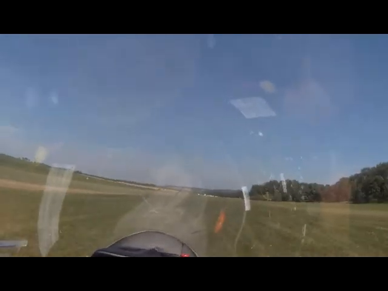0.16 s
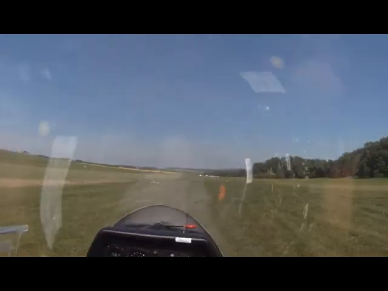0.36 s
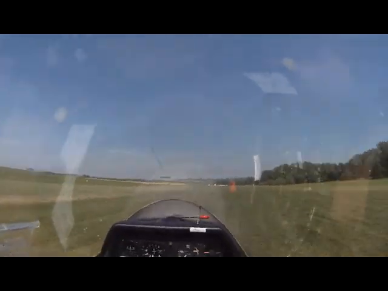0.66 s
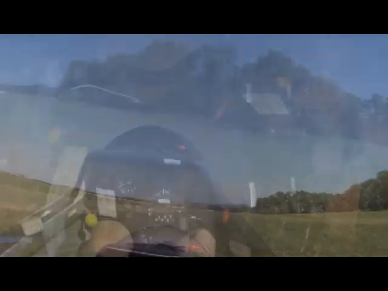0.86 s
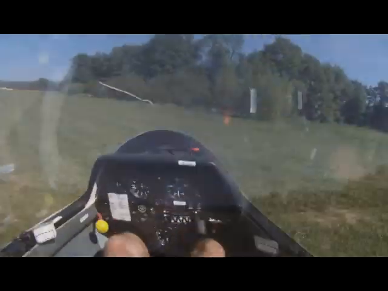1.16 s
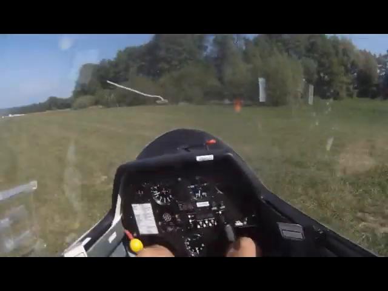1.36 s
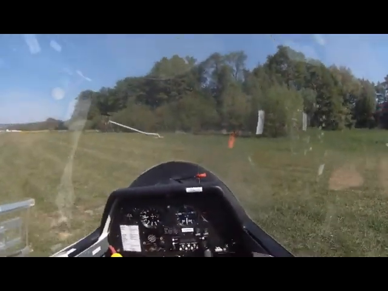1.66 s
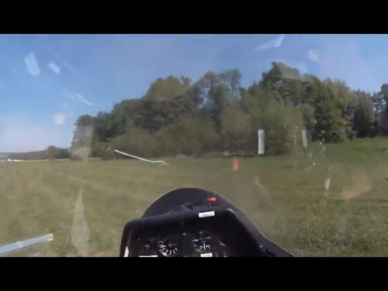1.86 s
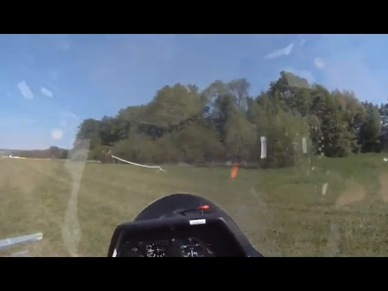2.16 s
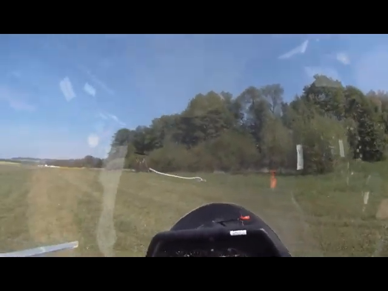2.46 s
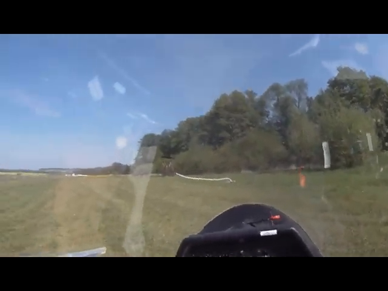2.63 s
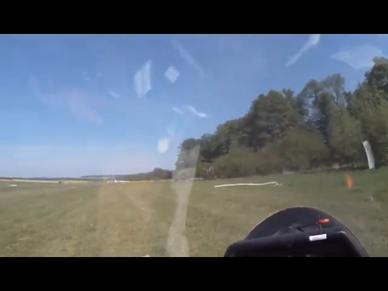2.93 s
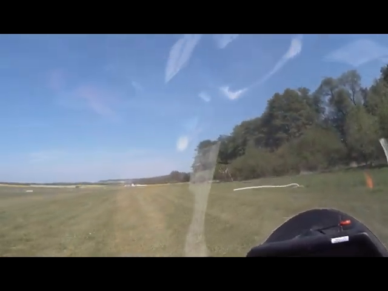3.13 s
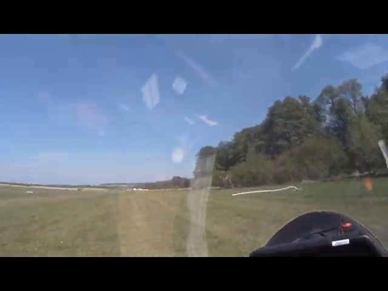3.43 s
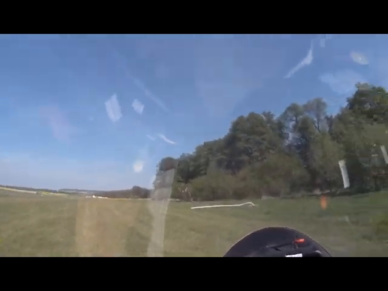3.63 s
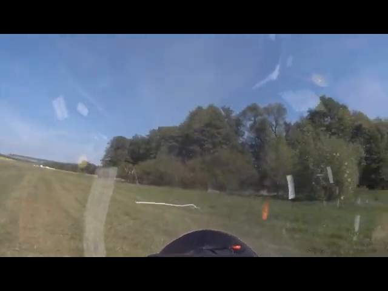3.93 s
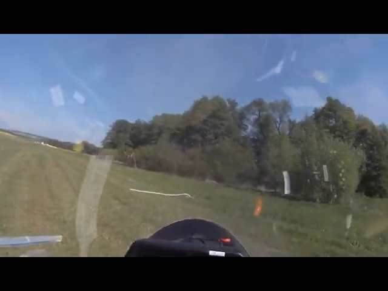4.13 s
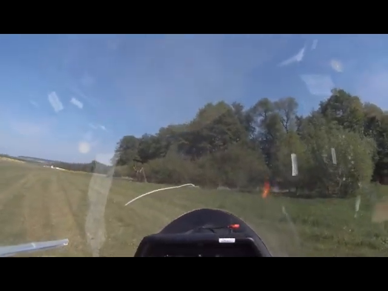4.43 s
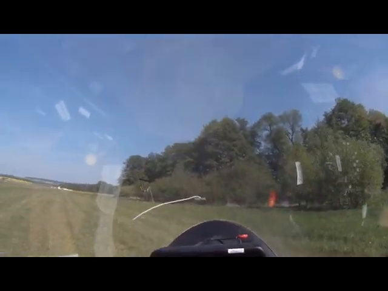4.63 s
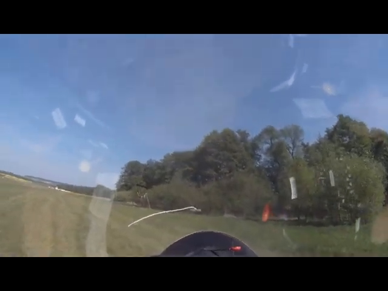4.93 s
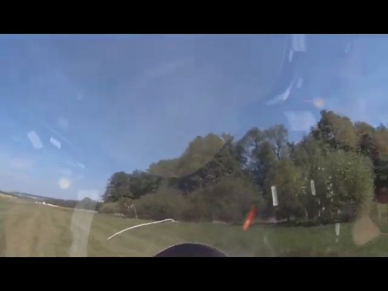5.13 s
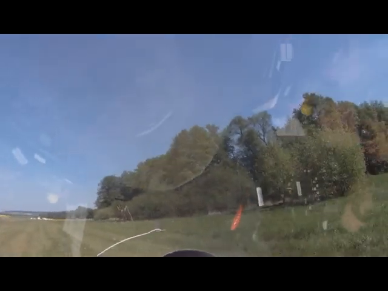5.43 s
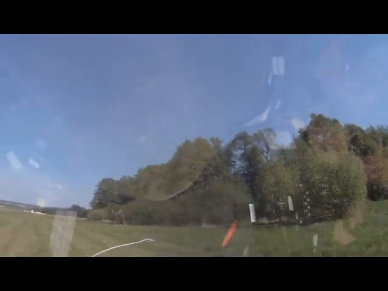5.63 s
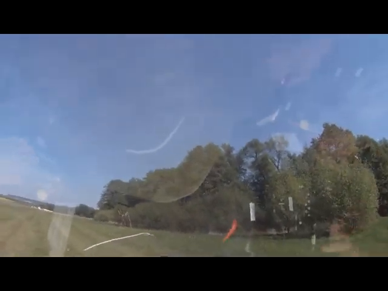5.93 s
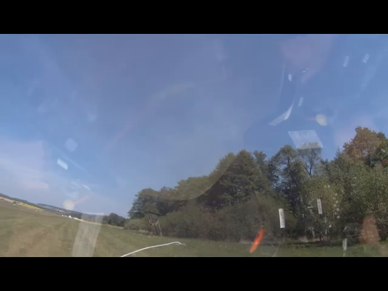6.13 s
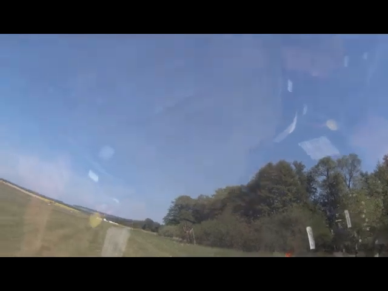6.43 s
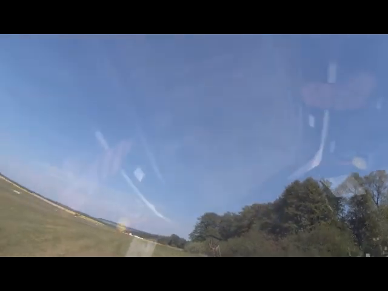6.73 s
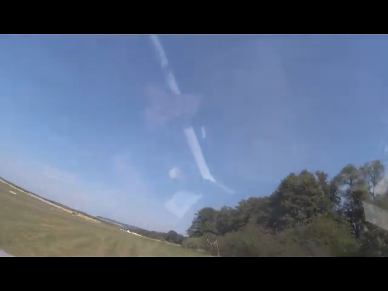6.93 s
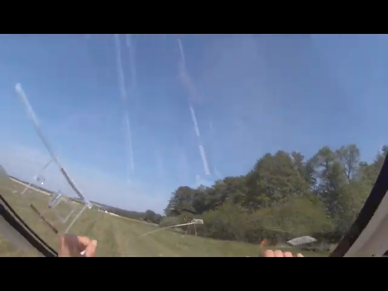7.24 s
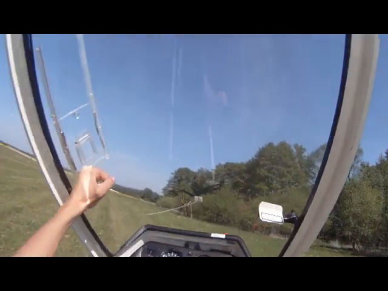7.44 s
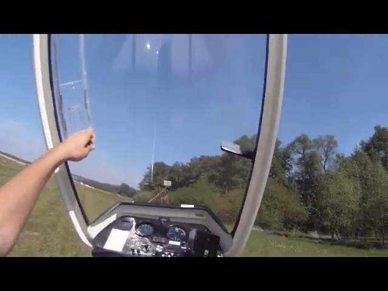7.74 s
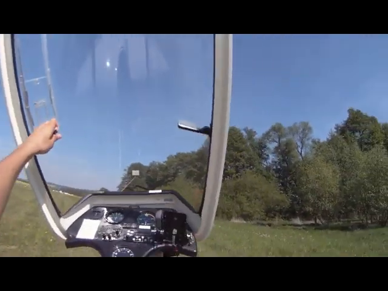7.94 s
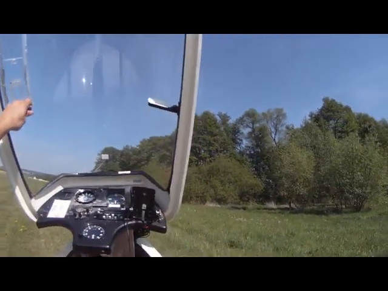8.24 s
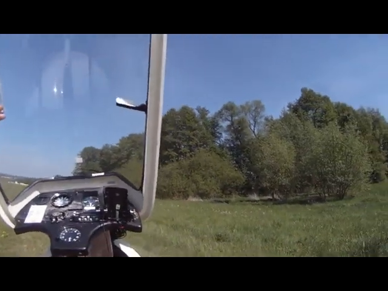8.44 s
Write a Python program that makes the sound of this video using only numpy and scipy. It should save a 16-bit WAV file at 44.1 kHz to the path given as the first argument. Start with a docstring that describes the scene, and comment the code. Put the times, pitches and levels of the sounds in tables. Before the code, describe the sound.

Inside a glider rolling over rough grass, a microphone shut in a plastic case catches violent clattering, low wheel rumble, distorted cracks and tiny metallic jingles. A last heavy lurch comes just after two seconds, then the noise falls away. Sparse muffled knocks and scuffs follow as the pilot stirs, then a brief latch creak, thin squeaks and faint hiss as the canopy opens.

```python
"""A glider rolls out over bumpy grass, stops, and the pilot stirs and opens the canopy.
Place: aboard the glider. Microphone: shut inside a camera case, so distance is nil for whatever touches it.
Lurches, knocks and scuffs are noisy impacts ringing four vibrating zones of the case; dry ticks ring their own.
Wheel rumble and fuselage heave are coloured noise, a fitting jingles in decaying modes, and the canopy
creaks in stick-slip harmonics and squeaks in wavering sines. The hardest knocks overload the microphone."""
import sys
import numpy as np
from scipy import signal
from scipy.fft import rfft, irfft
from scipy.io import wavfile
from scipy.ndimage import uniform_filter1d

SR = 44100
rng = np.random.default_rng(int(sys.argv[2]) if len(sys.argv) > 2 else 0)


def unload_audio(sound):
    """Save the sound as a 16-bit wav file, at the path given as the first command line argument."""
    columns = np.transpose(np.atleast_2d(sound))
    # keep every value between -1 and 1, then stretch to whole-number steps
    steps = np.round(np.clip(columns, -1, 1) * 32767)
    wavfile.write(sys.argv[1], SR, steps.astype(np.int16))


N = 378819


def gain_of(db):
    """Decibels to amplitude gain."""
    return 10 ** (np.asarray(db) / 20)


def evened(x):
    """Scales a signal to rms 1."""
    return x / np.sqrt(np.mean(x ** 2) + 1e-20)


def curve(rows):
    """Joins a table's timed points by straight lines: each column as one value a sample."""
    s, *columns = np.transpose(rows)
    return np.array([np.interp(np.arange(N) / SR, s, column) for column in columns])


def add(mix, s, sound):
    """Adds a sound to the mix from s seconds on, along the last axis."""
    part = mix[..., max(0, round(s * SR)):][..., :sound.shape[-1]]
    part += sound[..., :part.shape[-1]]


def coloured(points):
    """Steady noise of rms 1 with a given spectrum, joined along log frequency."""
    hz = np.fft.rfftfreq(N, 1 / SR)
    f, db = np.transpose(points)
    colour_db = np.interp(np.log(hz + 1), np.log(f + 1), db)
    return evened(irfft(rfft(rng.standard_normal(N)) * gain_of(colour_db), N))


def flicker(seconds, spread_db):
    """Random gain of rms 1, from noise averaged over the given time."""
    wander = uniform_filter1d(rng.standard_normal(N), max(2, int(seconds * SR)))
    return evened(gain_of(spread_db * evened(wander)))


def ringing(modes):
    """Response of a zone to a tick, energy 1; each mode swells and dies, so its skirts are steep."""
    t = np.arange(4096) / SR
    tick = np.zeros(len(t))
    for k, (hz, width_hz, db) in enumerate(modes):
        swell_and_die = width_hz ** 2 * t * np.exp(-1.5 * np.pi * width_hz * t)
        tick += (-1) ** k * gain_of(db) * swell_and_die * np.sin(2 * np.pi * hz * t)
    return tick / np.linalg.norm(tick)


# steady shaking of the case over the grass: t/s, shake level/dB,
# weight/dB (how much of it comes up from the wheel and fuselage)
ROLL = [(0.0, -23.5, 1.5), (0.15, -34, -1), (0.22, -25, 4), (0.44, -27, 1), (0.58, -33.5, 4),
        (0.88, -28, 0.5), (1.1, -21, -5.5), (1.3, -24, -5.5), (1.38, -28.5, -1), (1.43, -30.5, -23),
        (1.55, -38, -4), (1.66, -35, -6.5), (1.8, -44.5, -6), (2.0, -47, 5), (2.2, -41, -4),
        (2.53, -38.5, -2), (2.66, -47, 0), (3.05, -55.5, -3.5), (3.45, -55.5, -0.5), (3.9, -49, 0),
        (4.08, -49.5, -4.5), (4.2, -58, -1.5), (4.7, -51, -1.5), (5.2, -55.5, 2.5), (5.6, -48, -4),
        (5.8, -55, 2), (6.45, -55.5, 1), (6.78, -55, -3.5), (6.9, -53.5, -2), (7.04, -49.5, -2),
        (7.12, -55, -4), (7.3, -53.5, -1.5), (7.5, -58.5, -13), (8.2, -60.5, -9), (8.4, -59, -9.5),
        (8.59, -60, -6.5)]
# share of the shaking, rows shell, wall, port, rattle, rumble: level/dB, dB per dB of weight,
# dB per dB of shake (above -40 dB for the zones, above -34.5 dB for the rumble)
SHARES = [(-3.5, 0.5, 0.07), (-1.5, 0.08, 0.0578), (-3, -0.23, 0.1964), (-20.5, -0.52, 0.0639),
          (-12.5, 1.04, -0.05)]
# lurches of the whole fuselage: t/s of the top, shake level/dB, rumble level/dB, t60/s, heave level/dB
LURCHES = [(.02, -38, -29, 0.44, -49), (0.333, -20.5, -32.5, 0.44, -50), (.99, -15, -29, 0.16, -57),
           (1.881, -34, -42.5, 1.6, -51.5), (2.249, -17, -27.5, 0.68, -39.5), (3.507, -43, -56, 2.4, -56),
           (4.74, -46.5, -57, 1.4, -58), (4.87, -37.5, -41, 0.7, -72), (5.841, -42.5, -48, 2.45, -54),
           (6.79, -68, -49.5, 0.55, -64), (7.06, -47.5, -45, 0.32, -64)]
LURCH_RISE_S = 0.027
HEAVE_DB, HEAVE_PER_SHAKE = -61.5, 0.75  # rolling heave at -40.5 dB of shake, before rumble() trims it; dB per dB


def motion():
    """Drive of the four zones, the wheel rumble and the heave: the roll plus dying lurches, added as power."""
    roll_db, weight_db = curve(ROLL)
    t = np.arange(2 * SR) / SR
    lurch_power = np.zeros((3, N))
    for s, shake_db, rumble_db, t60, heave_db in LURCHES:
        shape = gain_of(-60 * t / t60) * np.minimum(t / LURCH_RISE_S, 1)
        levels = gain_of([[shake_db], [rumble_db], [heave_db]])
        add(lurch_power, s - LURCH_RISE_S, (levels * shape) ** 2)
    share_db, per_weight, per_shake = np.transpose(SHARES)[:, :, None]
    total_db = 10 * np.log10(gain_of(roll_db) ** 2 + lurch_power[0])
    zones = gain_of(total_db + share_db + per_weight * weight_db + per_shake * (total_db + 40.0))
    wheel_db = roll_db + share_db[-1] + per_weight[-1] * weight_db + per_shake[-1] * (roll_db + 34.5)
    heave = gain_of(HEAVE_DB + HEAVE_PER_SHAKE * (roll_db + 40.5))
    wheel_level = np.sqrt(gain_of(wheel_db) ** 2 + lurch_power[1])
    heave_level = np.sqrt(heave ** 2 + lurch_power[2])
    return zones[:-1], wheel_level, heave_level


# spectrum of the wheel rumble: f/Hz, density level/dB
RUMBLE_COLOUR = [(12, -49), (40, -32), (70, -10.5), (107, 3.5), (146, -1), (200, -2.5), (260, -32),
                 (440, -120)]
# spectrum of the fuselage heave: f/Hz, density level/dB
HEAVE_COLOUR = [(12, -20), (26, -7), (40, -4), (62, -4.5), (90, -25), (200, -100)]
# trim on the heave as the airframe comes to rest: t/s, level/dB
OPEN_HEAVE = [(6.6, -3), (7.3, -8.5), (7.45, -25.5), (8.59, -27)]


def rumble(level, heave):
    """Lumpy low noise from the wheel, over the slow heave of the fuselage."""
    settling = gain_of(curve(OPEN_HEAVE)[0])
    heaving = heave * settling * coloured(HEAVE_COLOUR) * flicker(0.073, 2.8)
    return level * coloured(RUMBLE_COLOUR) * flicker(0.0078, 0.75) + heaving


BUMP_CAP = 1.6  # limit on the random bump size, which is then scaled to dB


def shaking(zones):
    """Force envelope of the jolting: a steady part plus small random bumps that strike fast and die away."""
    sizes = gain_of(7.8 * np.minimum(rng.exponential(1, N), BUMP_CAP))
    strikes = sizes * (rng.random(N) < 90 / SR)  # about 90 a second
    dying = gain_of(-60 * np.arange(4000) / SR / 0.13)
    bumps = evened(4.0 + signal.oaconvolve(strikes, dying)[:N])
    own = np.array([flicker(0.014, 2.5) for zone in zones])
    return zones * bumps * own


# knocks against the case: t/s, level/dB, thud rel. level/dB, chatter rel. level/dB,
# brightness/dB over the chatter, t60/s, ring f/Hz
KNOCKS = [(0.017, 5.5, -46, -13.5, 4, 0.006, 1384), (0.321, -7.5, -8.5, 1, 4, 0.028, 1213),
          (0.346, -13, -17, -22, 9.5, 0.059, 1120), (0.459, -17, -30, -5.5, -5, 0.25, 2820),
          (.678, -2, -35, -9.5, 3, 0.024, 1225), (0.76, -11, -21, -6, -1, 0.032, 1200),
          (.852, -14, -19, -8, 4, 0.12, 2560), (0.881, -5, -31, -24.5, 11, 0.2, 2607),
          (1.037, -16, -4.5, -24, 7, 0.14, 1140), (1.064, -14.5, -6, -2.5, -5, 0.13, 2760),
          (1.114, -13, -24, 6, 4, 0.022, 2680), (1.204, -8, -19, -7.5, 4, 0.12, 1360),
          (1.39, 5, -48, -10, -7, 0.022, 1934), (1.399, -17, -30, -14, 13, 0.044, 2720),
          (1.424, -10, -23, -32, 14, 0.053, 2710), (1.446, -19, -24, -4, 1, 0.07, 1290),
          (1.478, -20.5, -20, -12.5, 3, 0.033, 3420), (1.501, -12.5, -44, -30.5, 15.5, 0.12, 2630),
          (1.606, -13, -17, -2.5, 4.5, 0.075, 2730), (1.704, -24, -29, -10, 3, 0.044, 1260),
          (1.736, -20, -27, -10, 0, 0.027, 1230), (1.815, -20, -14, -1, 1.5, 0.093, 2830),
          (1.858, -27, -30, -16.5, 13, 0.018, 3430), (1.921, -7, -33, -10.5, -5.5, 0.026, 1176),
          (2.102, -13, -21.5, -5, -0.5, 0.11, 2580), (2.172, -7.5, -44, -10, -4, 0.019, 2020),
          (2.229, -20, -16, 0.5, 1.5, 0.04, 1405), (2.253, -14, -3.5, -1.5, 1.5, 0.05, 2800),
          (2.278, -14.5, -4.5, 0.5, -0.5, 0.084, 1260), (2.389, -7.5, -40, -12, 1.5, 0.019, 2010),
          (2.444, -22, -22, -5.5, 1, 0.15, 2770), (2.468, -21, -8.5, -4.5, 2.5, 0.15, 1100),
          (2.497, -20, -10.5, -7, 7.5, 0.095, 1150), (2.501, -25, -30, -6, 1, 0.046, 5250),
          (2.508, -26, -30, -8, 0, .05, 4750), (2.552, -21, -17.5, -1.5, 2, 0.12, 2860),
          (2.594, -24.5, -29, -6.5, 2, 0.17, 1077), (2.867, -27, -21, -1.5, 0.5, 0.082, 1230),
          (3.1, -36, -14, -1.5, -4, 0.1, 1235), (3.374, -38, -9, -3.5, 1.5, 0.15, 1197),
          (3.523, -39, -1, 1, -3.5, 0.18, 1280), (3.549, -43.5, -3, 7, -2, 0.065, 1250),
          (3.635, -45.5, 0, -11.5, 11.5, 0.053, 3070), (3.87, -50, -18, 7.5, 3, 0.033, 1370),
          (3.973, -34, -9, 1.5, -1, 0.18, 1060), (4.055, -31, -27, -0.5, -2, 0.098, 2680),
          (4.188, -45.5, -10.5, 7.5, -10.5, 0.077, 1260), (4.251, -43, -4, 1, 0.5, 0.12, 1144),
          (4.315, -51.5, -14, 0, 7, 0.051, 2600), (4.375, -36.5, -14, -12.5, 3.5, 0.24, 1294),
          (4.492, -41.5, -9.5, -7, 2, 0.18, 2510), (4.562, -44, -13, -3, -1, 0.044, 2700),
          (4.618, -29, -17.5, -1.5, 0, 0.098, 2670), (4.667, -42, -6, 0, -7.5, 0.037, 1220),
          (4.702, -46.5, -25, -14, 15, 0.022, 3130), (4.728, -41.5, -4, -0.5, 0, 0.15, 1340),
          (4.83, -24.5, 0, -2.5, 1.5, 0.12, 2690), (4.966, -33, -14, -14, 7, 0.14, 1460),
          (5.032, -54, -20, -3.5, 11, 0.18, 2780), (5.077, -38.5, -9.5, -5.5, 2.5, 0.11, 1370),
          (5.11, -42.5, -3, 1.5, -7, 0.094, 1246), (5.15, -39, -5, -21, -3.5, 0.035, 577),
          (5.189, -49.5, -9.5, -7.5, 7, 0.38, 2700), (5.263, -42, -7.5, -5, 1.5, 0.2, 1320),
          (5.438, -29.5, -12, -7.5, -9.5, 0.16, 1266), (5.496, -23.5, -20, -16, 4.5, 0.14, 1267),
          (5.573, -47.5, -9, -8, 9, 0.089, 2680), (5.924, -44, -13, -4, 9.5, 0.046, 2700),
          (6.007, -31, -10.5, -14.5, 6, 0.18, 1210), (6.116, -32.5, -13.5, -6, 6.5, 0.096, 2570),
          (6.145, -40.5, -4.5, -3, 3, 0.16, 2640), (6.254, -27.5, -41.5, -2, 0.5, 0.11, 1375),
          (6.566, -30, -3.5, 2.5, -5.5, 0.091, 1230), (6.696, -39.5, -1.5, -5.5, 0, 0.086, 1280),
          (6.911, -39.5, -27, -8, 1, 0.066, 2480), (7.062, -35.5, -8, -24, 13, 0.026, 253),
          (7.23, -37.5, -21, -4.5, -9, 0.045, 648), (7.269, -40, -25, -1.5, -9, 0.11, 1380),
          (7.318, -45, -3.5, -4, -7, 0.053, 750), (7.376, -32.5, -17, -7.5, 0.5, 0.048, 2590),
          (7.418, -32.5, -8.5, -5.5, -15, 0.047, 1097), (7.541, -47.5, -3.5, -0.5, -2, 0.18, 760),
          (7.579, -28, -33.5, -21, 8, 0.047, 1050), (7.606, -45, -39, -12, 10.5, 0.081, 1330),
          (7.762, -52, -5, -2.5, -5, 0.06, 1240), (7.86, -53, -24, -10.5, 12.5, 0.098, 2730),
          (7.97, -58, -2, 2.5, -1.5, 0.12, 1220), (8.032, -58.5, -2.5, -7, 5, 0.28, 556),
          (8.296, -55.5, -21, -0.5, 1.5, 0.66, 1830), (8.35, -49.5, -9, -7.5, 0, 0.075, 1214),
          (8.437, -55, -18.5, -10.5, 1.5, 0.13, 1310)]
# scuffs, which swell in where a knock strikes: same columns as the knocks
SCUFFS = [(0.265, -15.5, -8, -2.5, 0.5, 0.23, 1423), (0.324, -14.5, -1.5, -11, -6, 0.1, 308),
          (0.392, -21, -15, 2, -9, 0.11, 2670), (0.624, -14.5, -8.5, -2, 4.5, 0.14, 1428),
          (1.081, -20, -14, 4.5, 0, 0.18, 2610), (1.125, -18.5, -31, 4, 3.5, 0.041, 2680),
          (1.349, -10.5, -16.5, -0.5, 4, 0.11, 2557), (1.439, -19.5, -12, -10, -2, 0.069, 2750),
          (1.546, -26, -11, -9.5, 6, 0.059, 2710), (1.667, -32, -3, -1, -2, 0.16, 1270),
          (1.714, -28.5, -21, -5.5, 5.5, 0.21, 2950), (1.888, -29.5, -32, -1.5, -2, 0.19, 2670),
          (1.959, -40.5, -14, -7.5, 8.5, 0.21, 1266), (2.025, -33.5, -25, -1.5, -2, 0.078, 2580),
          (2.234, -11.5, -11, -4.5, 0.5, 0.41, 1246), (2.285, -14, -5, -1.5, -2, 0.086, 1277),
          (2.319, -20, 0, 2, -3, 0.13, 1264), (2.335, -13, -17, 0.5, 0.5, 0.098, 1285),
          (2.986, -36.5, -17, -5.5, 2.5, 0.12, 2570), (3.499, -35, -13, -5, -6, .088, 1308),
          (3.769, -37, -8.5, -5, 0, 0.51, 334), (3.931, -38.5, -3, -5, -3, 0.085, 2513),
          (4.765, -37, -4, -4.5, -3, 0.02, 2590), (4.841, -15.5, -10.5, -7.5, -1.5, 0.21, 304),
          (5.795, -51, -15, -7.5, 6.5, 0.08, 2710), (5.838, -36.5, -12.5, -7.5, 2.5, 0.3, 225),
          (5.867, -37.5, -3, 1, -3.5, 0.31, 2640), (6.063, -41, -3, 0, 3.5, 0.091, 968),
          (6.325, -36.5, -2.5, 0.5, 2.5, 0.15, 2970), (6.343, -21, -8.5, -1, 6, 0.087, 1234),
          (7.82, -36, -27, -7.5, 3.5, 0.07, 1243), (8.052, -50.5, -3.5, -12.5, -1, 0.12, 557),
          (8.078, -41, -8.5, -6.5, 3, 0.064, 1060)]
RISE_S, RISE_PER_T60, SCUFF_RISE_S = 0.0018, 0.0071, 0.012  # a longer knock also rises slower
RING_RISE = 1.2  # the struck spot swells this many times slower than the chatter
BLOW_DB, SCUFF_BLOW_DB = 13.5, 12  # the single hard contact, over each zone's level
RATTLE_DB, RATTLE_PER_BRIGHT = -22, 2.09  # rattle over the chatter: dB, and dB per dB of brightness


def knocks():
    """Zone forces (quick rise, fall soonest in the treble), a hard blow at their top, the struck spot's ring."""
    force_power, blows, ring = np.zeros((4, N)), np.zeros((4, N)), np.zeros(N)
    t = np.arange(SR // 4) / SR
    lasting = np.array([[1.3], [1.], [.9], [.7]])  # t60 factor of shell, wall, port, rattle
    contacts = [(RISE_S + RISE_PER_T60 * row[5], BLOW_DB, row) for row in KNOCKS]
    contacts += [(SCUFF_RISE_S, SCUFF_BLOW_DB, row) for row in SCUFFS]
    for rise, blow_db, (s, db, thud_db, chatter_db, bright_db, t60, hz) in contacts:
        rattle_db = chatter_db + RATTLE_DB + RATTLE_PER_BRIGHT * bright_db
        zones_db = db + np.array([[thud_db], [chatter_db], [chatter_db + bright_db], [rattle_db]])
        rising = np.clip(t / rise, 0, 1) ** 0.8
        fall_db = -60 * np.maximum(t - rise, 0) / max(t60, .008)
        add(force_power, s, (gain_of(zones_db + fall_db / lasting) * rising) ** 2)
        add(blows, s + rise, gain_of(zones_db + blow_db))
        ring_rise = RING_RISE * rise
        ring_fall_db = -60 * np.maximum(t - ring_rise, 0) / np.clip(t60, .008, 0.06)
        ring_level = gain_of(db - 3 + ring_fall_db) * np.clip(t / ring_rise, 0, 1)
        add(ring, s, ring_level * np.sin(2 * np.pi * hz * t))
    return np.sqrt(force_power), blows, ring


# four zones of the case, each a list of resonances: f/Hz, width/Hz, rel. level/dB
SHELL = [(243.4, 48, 2.5), (337, 50, -3.5), (427, 77.5, 1), (690, 376, -3.5)]
WALL = [(936, 380, -4.5), (1303, 274, 2), (1536, 130, -0.5), (1746, 460, -8)]
PORT = [(1894, 633, 0), (2650, 408, 7.5), (3022, 377, 2), (3445, 465, -7.5)]
RATTLE = [(5135, 850, 8.5), (6030, 1370, 0), (8000, 1100, -9)]


def case(shake):
    """Many tiny impacts, sized by the force, ring each zone of the case."""
    force, blows, ring = knocks()
    impacts = rng.standard_normal((4, N)) * flicker(0.0012, 2.3)
    zones = [ringing(modes) for modes in (SHELL, WALL, PORT, RATTLE)]
    hits = np.hypot(force, shaking(shake)) * impacts + blows
    return ring * flicker(0.0044, 2.3) + signal.oaconvolve(hits, zones, axes=1)[:, :N].sum(0)


PINGS_PER_S, PING_DB, PING_T60_S = 80, 2.5, 0.011  # level over the shaking, before the random size
PING_SPREAD = 0.052  # scatter of the pitches, in natural log of frequency


def pings(shake):
    """Loose parts tap the case at random: short rings near wall and port resonances, sized by the shaking."""
    struck = gain_of(1.3 * np.minimum(rng.exponential(1, N), 3)) * (rng.random(N) < PINGS_PER_S / SR)
    size = struck * shake
    spots = [WALL[1][0], PORT[1][0]] * 8
    spot = rng.integers(0, len(spots), N)
    t = np.arange(2048) / SR
    level = gain_of(PING_DB - 60 * t / PING_T60_S) * np.minimum(t / 0.0011, 1)
    out = np.zeros(N)
    for k, hz in enumerate(spots * np.exp(PING_SPREAD * rng.standard_normal(len(spots)))):
        ring = level * np.sin(2 * np.pi * hz * t)
        out += signal.oaconvolve(size * (spot == k), ring)[:N]
    return out


# dry bright ticks of plastic on plastic: t/s, level/dB of the force
TICKS = [(0.018, -15), (0.058, -40), (0.2095, -35), (.2655, -45), (0.311, -35.5), (0.322, -15), (.338, -41),
         (.35, -38.5), (0.6785, -17.5), (0.7, -39.5), (0.7614, -34), (0.7986, -39), (0.8565, -36),
         (0.8844, -24.5), (0.964, -37), (1.038, -37.5), (1.067, -35), (1.085, -31.5), (1.1163, -12.5),
         (1.1363, -37), (1.208, -26), (1.23, -24), (1.361, -26), (1.3901, -7.5), (1.6077, -40),
         (2.24, -38.5), (2.2475, -31), (2.254, -28), (2.26, -32), (2.271, -35), (2.279, -37.5),
         (2.2996, -31), (2.3441, -31), (2.348, -43), (6.2565, -56)]
# bursts of ticks too dense to tell apart: t/s, level/dB of the force, t60/s
FIZZES = [(.268, -68, 0.09), (.626, -59, 0.07), (6.339, -46, 0.12)]
# resonances of a tick: f/Hz, width/Hz, rel. level/dB
TICK = [(6300, 2500, -1.5), (9750, 1800, -5.5), (13300, 3600, -10)]
FIZZ_RISE_S = 0.0051


def ticks(shake):
    """Noise bursts ring the tick resonances: loud ones listed, small ones at random, sized by the shaking."""
    t, slow = np.arange(600) / SR, np.arange(SR // 8) / SR
    force = shake * gain_of(-36.5) * flicker(0.013, 3.)  # the faintest ticks merge into a fizz
    for s, db in TICKS:
        add(force, s, gain_of(db - 60 * t / 0.0073) * np.minimum(t / 0.00046, 1))
    for s, db, t60 in FIZZES:
        fall_db = -60 * np.maximum(slow - FIZZ_RISE_S, 0) / t60
        add(force, s, gain_of(db + fall_db) * np.minimum(slow / FIZZ_RISE_S, 1))
    sizes = shake * gain_of(-32.5 + 2.5 * np.minimum(rng.exponential(1, N), 3))
    small = sizes * (rng.random(N) < 35 / SR)  # about 35 a second
    force += signal.oaconvolve(small, gain_of(-60 * t / .005))[:N]
    return signal.oaconvolve(force * rng.standard_normal(N), ringing(TICK))[:N]


# modes of a small metal fitting: f/Hz, t60/s
FITTING = [(6120, 0.31), (7000, 0.088), (7690, 0.14), (8310, 0.14), (10050, 0.16), (11200, 0.11),
           (12200, .15), (12900, .1)]
# its clinks: t/s, level/dB, loudest region f/Hz
CLINKS = [(0.116, -40, 9600), (.235, -52, 8000), (.505, -53, 8250), (.885, -35, 8300), (1.165, -48, 11200),
          (1.235, -35, 8900), (1.524, -44, 8900), (1.695, -44, 8500), (1.754, -40.5, 6300),
          (1.842, -40, 7900), (2.482, -37.5, 8200), (2.57, -48, 7500)]


def jingle():
    """Each clink wakes the fitting's modes near its loudest region most, unevenly, and they die away."""
    out, t = np.zeros(N), np.arange(SR // 5) / SR
    hz, t60 = np.transpose(FITTING)[:, :, None]
    lucks = rng.standard_normal((len(CLINKS), len(FITTING), 1))
    for (s, db, top_hz), luck in zip(CLINKS, lucks):
        octaves_off = abs(np.log2(hz / top_hz))
        level = gain_of(db - 38 * octaves_off + 3 * luck - 60 * t / t60)
        add(out, s, (level * np.sin(2 * np.pi * hz * t)).sum(0) * np.minimum(t / 0.013, 1))
    return out * flicker(.006, 2.5)


# creak of the canopy latch, full at first, then thin: t/s, slip rate f/Hz, level/dB, tilt/dB per octave
CREAK = [(6.81, 394, -56, 0), (6.815, 384, -41, -7.5), (6.824, 375, -37.5, -5.5), (6.834, 380, -48, 2),
         (6.89, 400, -48, 10), (6.92, 450, -49, 17.5), (6.97, 445, -46, 10.5), (7.02, 425, -50, 14),
         (7.085, 420, -62, 13.5)]
# spectrum of the creak before the tilt: f/Hz, level/dB
CREAK_COLOUR = [(200, -15), (380, -0.5), (760, 6.5), (1150, 7), (1600, -9), (2400, -9.5), (3200, -26),
                (4000, -58.5)]
# thin squeaks as the canopy swings: t/s, length/s, start f/Hz, end f/Hz, peak level/dB, waver/share of f
SQUEAKS = [(7.195, .02, 2900, 2500, -55, .02), (7.328, .018, 2750, 2650, -50, .015),
           (7.432, .046, 3980, 3940, -66, .008), (7.365, .014, 2300, 2650, -52, .02),
           (7.45, .032, 3350, 2350, -54, .016), (7.515, .025, 2950, 2550, -53, .015),
           (7.625, .014, 3750, 3800, -62, .02), (7.654, .094, 3300, 3280, -62, .035),
           (7.656, .095, 3800, 3700, -67, .025), (7.66, .096, 2950, 2900, -60, .035)]
CREAK_GRIT_DB = 5  # spread of each harmonic's flicker


def canopy():
    """Slightly uneven stick-slip pulses, as nine harmonics, for the creak; wavering sines for the squeaks."""
    out = np.zeros(N)
    s, rate, db, tilt_db = np.transpose(CREAK)
    t = np.arange(s[0], s[-1], 1 / SR)
    unevenness = np.interp(t - s[0], [.02, .05], [.03, .06])
    hz = np.interp(t, s, rate) * (1 + unevenness * evened(uniform_filter1d(rng.standard_normal(len(t)), 200)))
    phase = 2 * np.pi * np.cumsum(hz) / SR
    f, colour_db = np.transpose(CREAK_COLOUR)
    tilt_now_db = np.interp(t, s, tilt_db)
    slips = np.zeros(len(t))
    for k in range(1, 10):
        level_db = np.interp(k * hz, f, colour_db) + tilt_now_db * np.log2(k / 3)  # pivots on harmonic 3
        grit = flicker(0.0046, CREAK_GRIT_DB)[:len(t)]
        slips += gain_of(level_db) * np.sin(k * phase + k * k) * grit
    add(out, s[0], evened(slips) * gain_of(np.interp(t, s, db)))
    for s, length, from_hz, to_hz, db, waver in SQUEAKS:
        n = int(length * SR)
        wavering = 1 + waver * evened(uniform_filter1d(rng.standard_normal(n), 60))
        hz = np.linspace(from_hz, to_hz, n) * wavering
        add(out, s, gain_of(db) * np.sin(2 * np.pi * np.cumsum(hz) / SR) * signal.windows.tukey(n, .5))
    return out


OPEN_S, OPEN_LENGTH_S = 6.6, 0.43
OPEN_HZ, OPEN_RUMBLE_DB = 390, -3.5  # the opened canopy no longer holds the bass under this pitch


def high_pass(x, order, hz):
    """Takes the bass out below a corner frequency."""
    return signal.sosfilt(signal.butter(N=order, Wn=hz, btype="high", fs=SR, output="sos"), x)


def scene():
    """Everything at one microphone; the stiff case passes little bass of its own, less once the canopy opens."""
    zones, wheel, heave = motion()
    stiff = high_pass(case(zones) + ticks(zones[1]) + pings(zones[1]), 3, 170)
    thin = high_pass(stiff, 2, OPEN_HZ)
    opened = np.clip((np.arange(N) / SR - OPEN_S) / OPEN_LENGTH_S, 0, 1)
    contact = stiff + opened * (thin - stiff)
    low = rumble(wheel * gain_of(OPEN_RUMBLE_DB * opened), heave)
    return (contact + low + jingle() + canopy())[None]


# spectrum of the circuit hiss: f/Hz, density level/dB
HISS = [(64, -45), (80, 0.5), (95, 0), (115, -18), (300, -32), (1200, -16.5), (4000, -12.5), (15000, -13),
        (15500, -38.5)]
HISS_DB, WHINE_HZ, WHINE_DB = -75.5, 7700, -87  # rms levels
EDGE_HZ = 16000


def record(dry):
    """Circuit hiss and a faint whine, hard overload, then the band limit."""
    whine = gain_of(WHINE_DB) * np.sqrt(2) * np.sin(2 * np.pi * WHINE_HZ * np.arange(N) / SR)
    clipped = np.clip(dry + gain_of(HISS_DB) * coloured(HISS) + whine, -1, 1)
    band = signal.firwin(511, EDGE_HZ, window=("kaiser", 9), fs=SR)
    return signal.oaconvolve(clipped, band[None], "same")


dry = scene()
out = record(dry)
unload_audio(out)
```